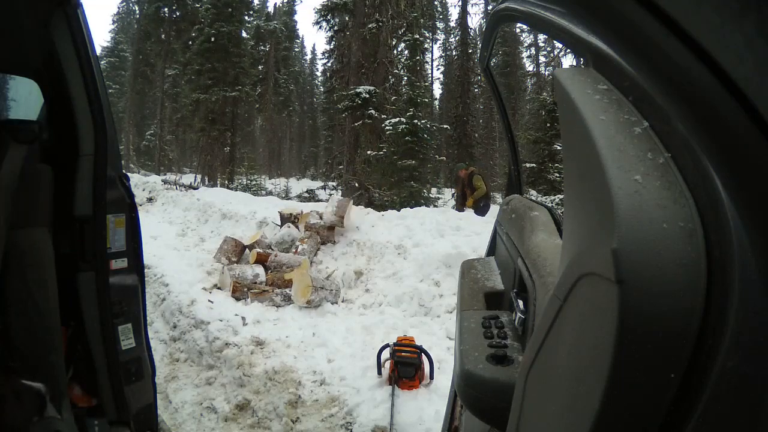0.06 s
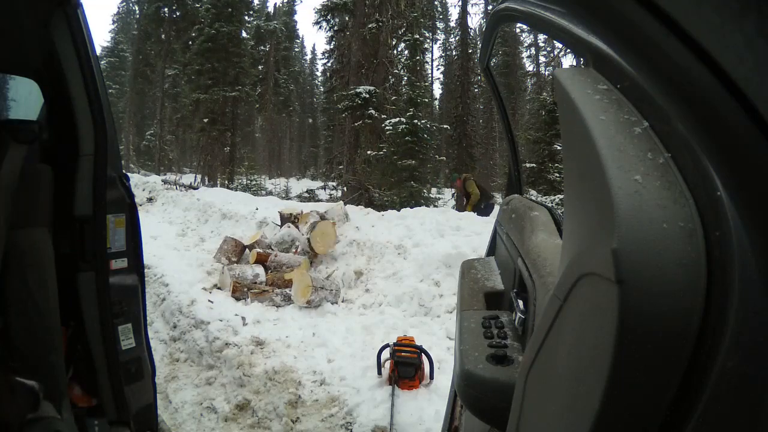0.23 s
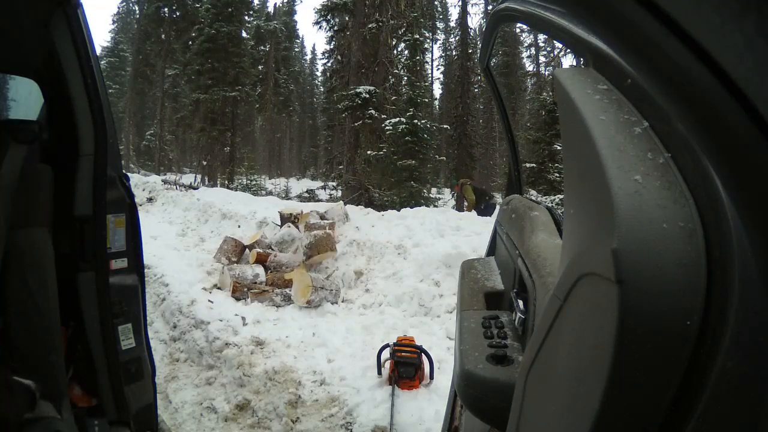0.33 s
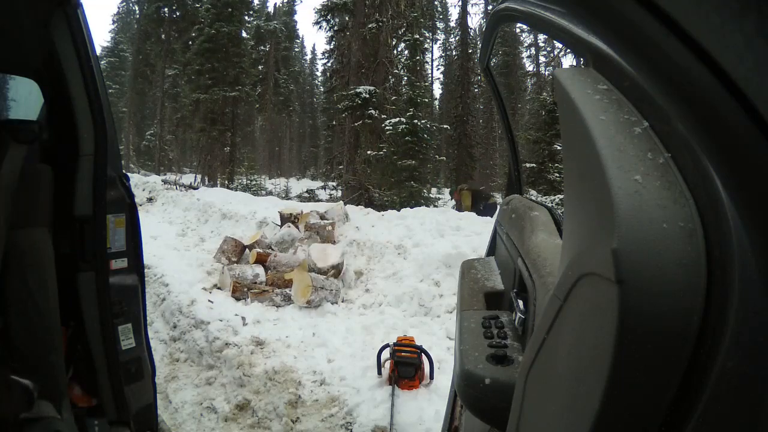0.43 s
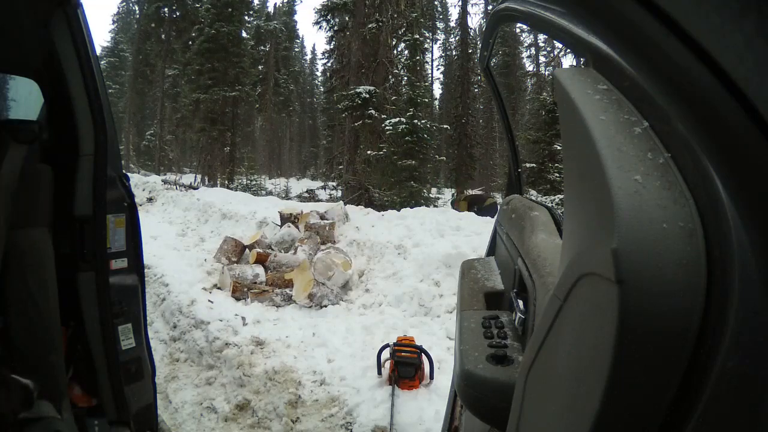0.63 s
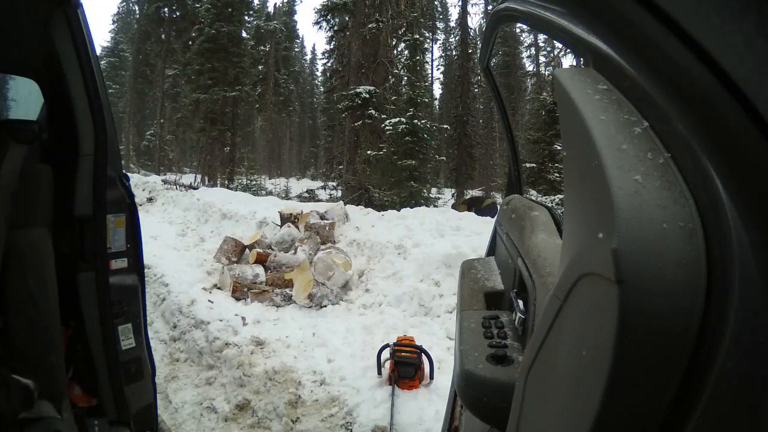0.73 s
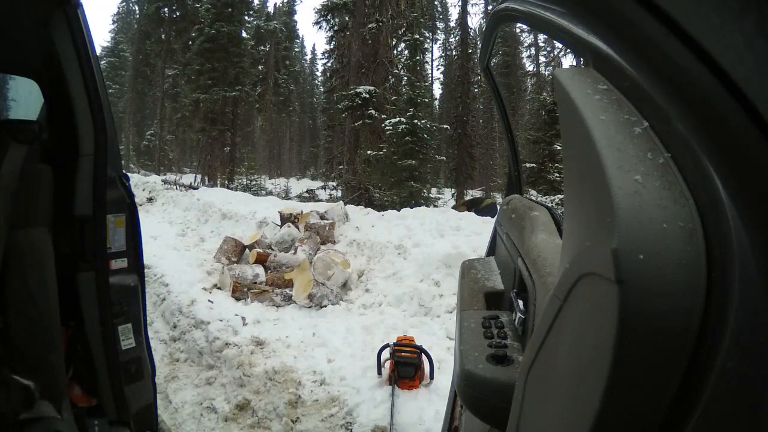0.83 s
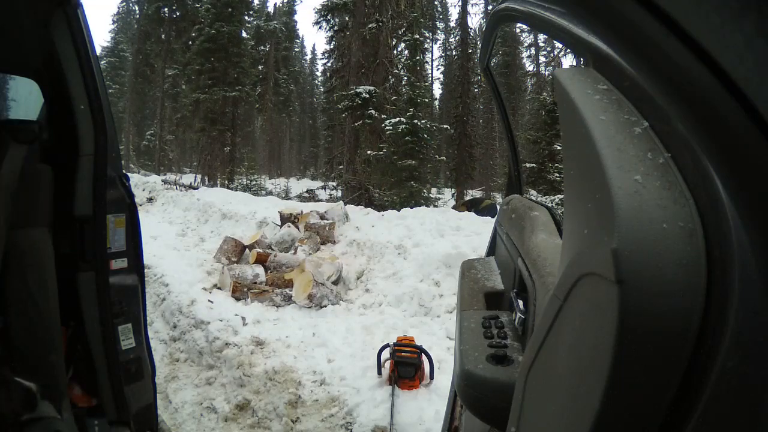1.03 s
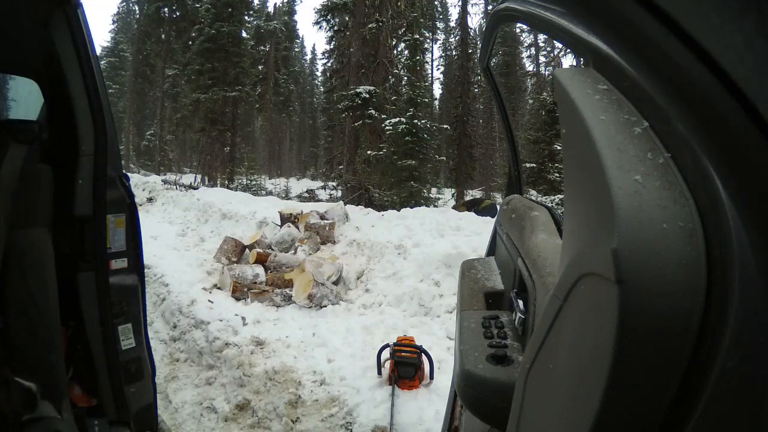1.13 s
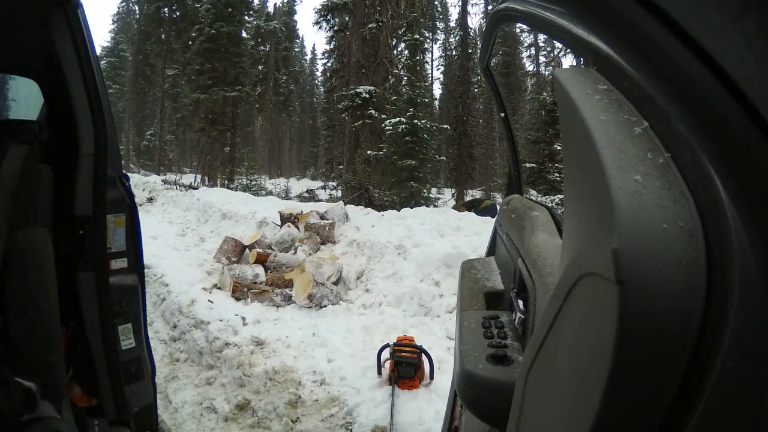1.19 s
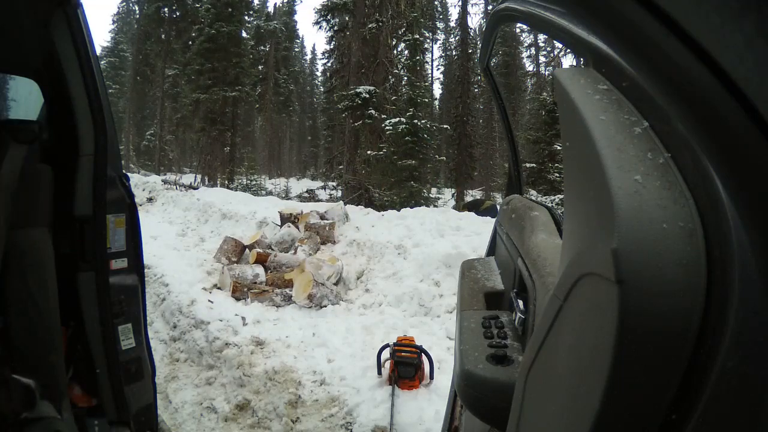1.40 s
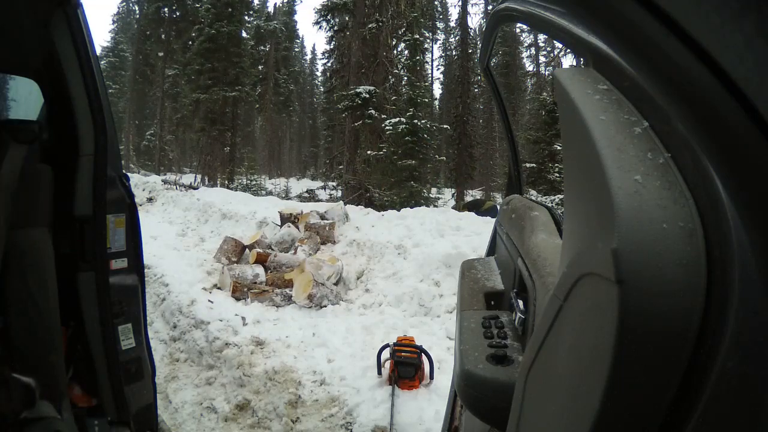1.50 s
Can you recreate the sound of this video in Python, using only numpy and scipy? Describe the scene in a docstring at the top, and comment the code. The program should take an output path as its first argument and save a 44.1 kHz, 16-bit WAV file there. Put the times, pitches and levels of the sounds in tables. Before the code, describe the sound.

A thrown log lands on a woodpile with one heavy thud and sharp icy ticks, then a softer second knock and scrape, settling quietly; heard from inside an open vehicle cab over faint hum and hiss.

```python
"""A frozen log thrown onto a snowy woodpile thuds, knocks and ticks, scrapes over bark and crust, and settles.
Thuds are short pressure pulses, knocks damped modes, and ticks brief rings with noise that excite the wood.
Scrapes are grainy noise passed through the resonances of wood and logs and the spectrum of icy crust.
The thuds reflect and reverberate in an open vehicle cab; a faint hum (two sines) and low rumble
and microphone hiss (filtered noise) lie beneath."""
import sys
import numpy as np
from scipy import signal
from scipy.fft import rfft, irfft, next_fast_len
from scipy.io import wavfile
from scipy.ndimage import map_coordinates

SR = 44100
rng = np.random.default_rng(int(sys.argv[2]) if len(sys.argv) > 2 else 0)


def to_wav(sig):
    """Store sig (one row per channel, or 1-D mono) as 16-bit WAV at the path in sys.argv[1].

    Samples outside -1..1 are clipped; the rate is SR.
    """
    pcm = np.clip(np.atleast_2d(sig), -1, 1) * 32767
    pcm = np.round(pcm).astype(np.int16)
    wavfile.write(sys.argv[1], SR, pcm.T)  # frames by channels


N = 68355
T = np.arange(N) / SR  # s

# soft contacts of the log: centre_s, level_db, period_ms
CONTACTS = [(.0588, -30, 7.5), (.0601, -36, 2), (.0657, -32, 4.5), (.2361, -2.1, 3.7), (.2525, -32, 3.5),
            (.2945, -23, 6), (.4425, -33, 4), (.464, -38, 4), (.469, -34, 4), (.4805, -39, 3.5),
            (.4907, -16.5, 4.2), (.502, -36, 8), (.526, -40, 7), (.575, -48, 8), (1.0142, -38.5, 9),
            (1.0203, -34, 5), (1.427, -50, 10), (1.497, -50, 11)]
# direct sound and reflections off the cab's walls: delay_s, left_gain, right_gain
WALL_PATHS = [(0, 1, .47), (.0037, -.08, .2), (.0059, .05, -.11), (.0079, -.05, -.21), (.0112, 0, .08),
              (.0168, -.08, 0)]
# hollow knocks that ring one log: start_s, level_db, pitch_hz
LOG_KNOCKS = [(.0608, -41, 900), (.238, -29.5, 880), (.27, -32.5, 935), (0.28, -36.5, 960),
              (.36, -54.5, 950), (0.4328, -33, 1053), (0.457, -39, 1190), (0.488, -34.5, 956),
              (1.0105, -45, 1130)]
# sharp ticks of bark and ice, before colouring: start_s, level_db, pitch_hz,
# crack_db (noise over ring, before TICK_NOISE)
BARK_ICE_TICKS = [(0.0511, -44.5, 3580, 2), (.0603, -37, 3290, -11), (0.2302, -21, 9800, -3.5),
                  (0.2329, -15, 10260, -3.5), (.2335, -30, 3620, -4.5), (0.2469, -20, 9200, -4.5),
                  (0.266, -33, 4370, 9.5), (0.2688, -30.5, 2220, -5), (.2715, -33.5, 3400, -5),
                  (0.2816, -29, 8166, 5), (.2895, -35.5, 3350, -5), (0.293, -24, 7820, -0.5),
                  (.293, -38, 2180, -4), (.4338, -31, 3540, 3.5), (.4352, -22, 9700, 4),
                  (.4403, -34.5, 2870, -4), (0.4443, -29.5, 3600, -1), (0.4515, -28.5, 2640, -7),
                  (0.4601, -36, 2640, 7.5), (0.4875, -37, 9700, -1), (0.5107, -48, 3140, -10),
                  (0.5545, -49, 3784, 3.5), (0.6094, -32.5, 10670, -2.5), (.852, -39.5, 10900, -11),
                  (1.010, -38, 3900, 3), (1.010, -33, 8800, 0), (1.307, -53.5, 3490, 5.5)]
# slides and crunches of the log: start_s, hold_s, t60_s, wood_db, crust_db, body_db
LOG_SLIDES = [(.050, .008, .05, -54, -52, -60), (.0595, .003, .07, -49, -62, -45),
              (.228, .006, .14, -43, -41, -42), (.258, .016, .08, -45, -46, -42),
              (.288, .008, .12, -49, -47, -47), (.315, .11, .1, -67, -63, -65),
              (.43, .032, .13, -42.5, -46.5, -49), (.484, .008, .2, -53, -57, -45),
              (.51, .02, .15, -62, -66, -57), (.852, .015, .1, -62, -66, -58), (.9, .1, .2, -65, -72, -67),
              (1.0092, .003, .045, -53, -55, -62)]
# resonances of the wood: centre_hz, width_hz, level_db
WOOD_MODES = [(1130, 460, 1.5), (2240, 350, 1.5), (2750, 450, 1.5), (3490, 330, 1), (4330, 700, -4)]
# relative spectrum of the icy crust: frequency_hz, density_db (per Hz)
CRUST_SPECTRUM = [(2940, -31), (5000, -12), (7690, -6.5), (9980, -6), (14100, -15), (15500, -29)]
# dull resonances of the logs, in a response applied twice: centre_hz, width_hz, level_db (per pass)
BODY_MODES = [(169.4, 210, 0), (303.3, 570, -2.5)]
# stereo coherence of ticks and scrapes: frequency_hz, likeness (1 is identical)
SCRAPE_COHERENCE = [(200, .8), (1000, .75), (5000, .62), (9000, .94), (14000, .85)]
# stereo balance: frequency_hz, left_over_right_db
STEREO_LEAN = [(40, 3.5), (150, -1), (1000, 2.5), (2500, -0.5)]
# hum partials, before swell and stereo balance: frequency_hz, level_db
HUM_PARTIALS = [(113, -66), (226, -77)]
# slow gain of the hum: time_s, gain_db
HUM_GAIN = [(0, -6), (.6, -9.5), (1.0, 2), (1.55, -2.5)]
# relative spectrum of murk and hiss: frequency_hz, density_db (per Hz)
AIR_SPECTRUM = [(12, -22), (60, -9.5), (150, -14.5), (230, -13), (400, -22), (1000, -25.5), (4000, -26.5),
                (13500, -26.5), (15500, -32)]
# stereo coherence of murk and hiss: frequency_hz, likeness (1 is identical)
AIR_COHERENCE = [(30, 0.55), (100, 0.2), (300, 0.69), (1650, 0.93), (5000, .95), (15000, 1)]

# pulse width in periods; phase that makes the push before outweigh the one after
PULSE_WIDTH, LEAD_RAD = .52, .65
TAIL_DB, TAIL_T60_S, TAIL_HZ = -13.5, 0.13, 305  # reverberation and its low-pass corner
CAB_HZ, CAB_WIDTH_HZ, CAB_DB = 85, 13, -5  # boom of the cab
LOW_CUT_HZ = 33
KNOCK_T60_S = 0.032
TICK_CYCLES, TICK_NOISE, TICK_T60_S = 3.5, .5, .007  # ring decay in cycles; crack gain; crack decay
BLOW_DB, BLOW_HZ = 17.5, 6000  # a tick's push on the wood; higher ticks are ice and push less
GRAINS_PER_S, GRAIN_SPREAD_DB, SMOOTH_SHARE = 900, 1.5, 0.87
RISE_S = 0.003
HUM_LEFT_DB = 13  # left over right
RUMBLE_HZ, RUMBLE_DB, RUMBLE_SWING_DB = 33, -69, 3
AIR_DB = -63
EDGE_HZ, ABOVE_EDGE_DB, TOP_HZ = 15400, -28, 16400


def amp(db):
    """Level to amplitude: 20 dB is a factor of ten."""
    return 10 ** (np.asarray(db) / 20)


def unit(x):
    """Normalisation to unit root-mean-square over all channels."""
    return x / np.sqrt(np.mean(x ** 2) + 1e-20)


def along(points, hz):
    """Linear interpolation of (Hz, value) points on a logarithmic frequency axis."""
    f, v = np.transpose(points)
    return np.interp(np.log(hz + 1), np.log(f + 1), v)


def filtered(x, response):
    """Linear filtering: the spectrum of x times a response of frequency, zero-padded."""
    m = next_fast_len(N + SR // 2)
    spectrum = rfft(x, m) * response(np.fft.rfftfreq(m, 1 / SR))
    return irfft(spectrum, m)[..., :N]


def resonances(modes):
    """Modal superposition: causal second-order resonances with alternating signs."""
    def response(f):
        total = 0
        for k, (centre, width, db) in enumerate(modes):
            damping = 1j * f * width
            total = total + (-1) ** k * amp(db) * damping / (centre * centre - f * f + damping)
        return total
    return response


def wobble(rate):
    """Slow fluctuation: a spline through random knots, rate of them a second."""
    knots = rng.standard_normal(int(N * rate / SR) + 4)
    return map_coordinates(knots, [T * rate])


def spread(pair, coherence):
    """Stereo coherence: sum and difference of two signals, then the frequency-dependent balance."""
    def mid_side(hz):
        angle = np.arccos(np.clip(along(coherence, hz), -1, 1)) / 2
        return np.array([np.cos(angle), np.sin(angle)])

    mid, side = filtered(pair, mid_side)
    stereo = np.array([mid + side, mid - side])
    return filtered(stereo, lambda hz: amp(np.outer([.5, -.5], along(STEREO_LEAN, hz))))


def pressure_pulse(centre, db, ms):
    """Soft-contact radiation: one suction between two smaller pushes, under a Gaussian envelope."""
    periods = (T - centre) * 1000 / ms
    return -amp(db) * np.cos(2 * np.pi * periods - LEAD_RAD) * np.exp(-(periods / PULSE_WIDTH) ** 2)


def thuds():
    """Enclosure acoustics: the cab reflects, reverberates and resonates with each contact pulse."""
    out = np.zeros((2, N))
    t = np.arange(SR // 5) / SR
    for s, db, ms in CONTACTS:
        pulse = pressure_pulse(s, db, ms)
        for delay, left, right in WALL_PATHS:
            out += np.outer([left, right], pressure_pulse(s + delay, db, ms))
        tail = rng.standard_normal((2, len(t))) * amp(-60 * t / TAIL_T60_S) * (1 - np.exp(-t / 0.0062))
        tail /= np.linalg.norm(tail[0])
        smear = signal.fftconvolve(pulse[None], tail, axes=1)[:, :N]
        out += amp(TAIL_DB) * filtered(smear, lambda hz: 1 / (1 + 1j * hz / TAIL_HZ) ** 2)
        out += filtered(pulse, resonances([(CAB_HZ, CAB_WIDTH_HZ, CAB_DB)]))
    return filtered(out, lambda hz: 1j * hz / (LOW_CUT_HZ + 1j * hz))


def knocks():
    """Free vibration: each knock excites one exponentially damped mode of a log."""
    start, db, hz = np.array(LOG_KNOCKS).T[..., None]
    t = np.maximum(T - start, 0)
    envelope = amp(db - 60 * t / KNOCK_T60_S) * (1 - np.exp(-t / 0.00011))
    phase = np.array([.3, -.3])[:, None, None]  # left, right
    ring = envelope * np.sin(2 * np.pi * hz * t + phase)
    return ring.sum(1) * amp([[2.5], [-2.5]])


def tick_colour(hz):
    """Spectral weighting: a band from 1.5 to 13 kHz with a hollow at 5.6 kHz."""
    band = 1 / (1 + (1500 / (hz + 1)) ** 4) / (1 + (hz / 13000) ** 4)
    return band * (1 - 0.64 * np.exp(-(hz / 1000 - 5.6) ** 2))


def ticks():
    """Impulsive excitation: each tick rings a few cycles with a crack of noise, and its blow rings the wood."""
    blows = np.zeros((2, N))
    out = np.zeros((2, N + SR))
    t = np.arange(SR // 40) / SR
    for s, db, hz, crack_db in BARK_ICE_TICKS:
        first = round(s * SR)
        ring = np.sin(2 * np.pi * hz * t) * np.exp(-t * hz / TICK_CYCLES)
        crack = TICK_NOISE * rng.standard_normal((2, len(t))) * amp(crack_db - 60 * t / TICK_T60_S)
        out[:, first:first + len(t)] += amp(db) * (ring + crack)
        push = -amp(db + BLOW_DB) / (1 + (hz / BLOW_HZ) ** 8)
        blows[:, first] = push * np.array([1, rng.standard_normal()])
    wood = filtered(blows, lambda hz: resonances(WOOD_MODES)(hz) / (1 + 1j * hz / BLOW_HZ) ** 2)
    return spread(wood + filtered(out[:, :N], tick_colour), SCRAPE_COHERENCE)


def grit():
    """Friction noise: random uneven catches modulate noise over a smooth bed of rubbing."""
    hits = (rng.random(N) < GRAINS_PER_S / SR) * amp(GRAIN_SPREAD_DB * rng.standard_normal(N))
    catches = np.convolve(hits, np.exp(-np.arange(120) / 22))[:N]  # decay in samples
    return rng.standard_normal((2, N)) * (SMOOTH_SHARE + unit(catches))


def scrape():
    """Source and filter: slides that start fast, hold and decay excite wood, icy crust and the logs' dull body."""
    power = np.zeros((3, N))
    for s, hold, t60, *db in LOG_SLIDES:
        t = np.maximum(T - s, 0)
        shape = (1 - np.exp(-t / RISE_S)) * amp(-60 * np.maximum(t - hold, 0) / t60)
        power += np.outer(amp(db), shape) ** 2
    colours = (resonances(WOOD_MODES),
               lambda hz: amp(along(CRUST_SPECTRUM, hz)),
               lambda hz: resonances(BODY_MODES)(hz) ** 2)
    layers = [gain * unit(filtered(grit(), colour)) for gain, colour in zip(np.sqrt(power), colours)]
    return spread(sum(layers), SCRAPE_COHERENCE)


def hum():
    """Harmonic tone: a low sine and its octave, wavering in phase, swelling slowly and stronger on the left."""
    tone = np.zeros(N)
    for hz, db in HUM_PARTIALS:
        cycles = hz * T + 0.024 * wobble(18) + rng.random()
        tone += amp(db) * np.sqrt(2) * np.sin(2 * np.pi * cycles)
    swell = amp(np.interp(T, *np.transpose(HUM_GAIN)))
    return tone * swell * amp([[HUM_LEFT_DB / 2], [-HUM_LEFT_DB / 2]])


def rumble():
    """Low-frequency noise: deep lumps of moving air, fluctuating in level and identical on both sides."""
    deep = filtered(rng.standard_normal(N), lambda hz: hz / (1 + (hz / RUMBLE_HZ) ** 4))
    return amp(RUMBLE_DB + RUMBLE_SWING_DB * wobble(6.1)) * unit(deep)


def air():
    """Stationary noise: distant outdoor murk and microphone hiss share one shaped spectrum."""
    noise = filtered(rng.standard_normal((2, N)), lambda hz: amp(along(AIR_SPECTRUM, hz)))
    return amp(AIR_DB) * unit(spread(noise, AIR_COHERENCE))


def scene():
    """Superposition: the pressures of all sources add."""
    return thuds() + knocks() + ticks() + scrape() + hum() + rumble() + air()


def record(dry):
    """Band limitation: the treble drops by a step above an edge and ends at the band limit."""
    return filtered(dry, lambda hz: np.where(hz < EDGE_HZ, 1, amp(ABOVE_EDGE_DB)) * (hz < TOP_HZ))


dry = scene()
out = record(dry)
to_wav(out)
```